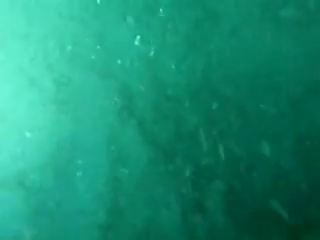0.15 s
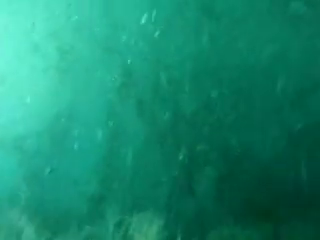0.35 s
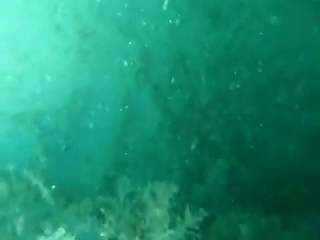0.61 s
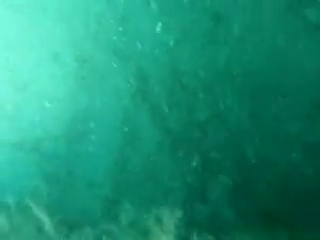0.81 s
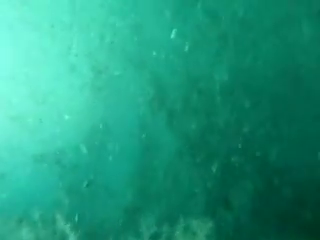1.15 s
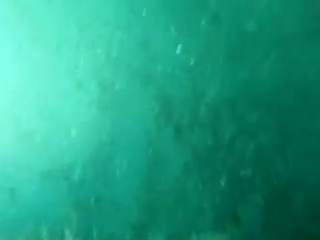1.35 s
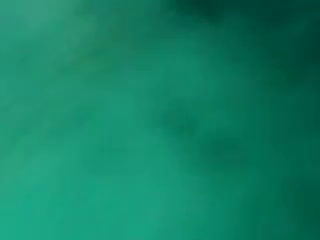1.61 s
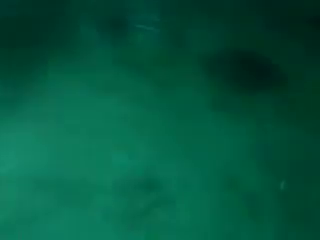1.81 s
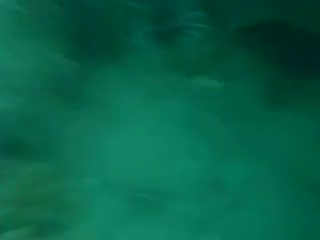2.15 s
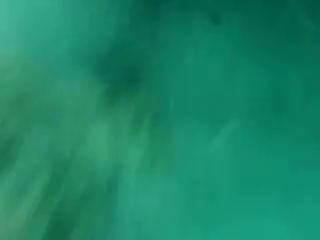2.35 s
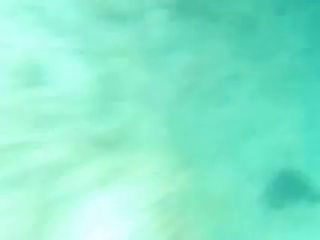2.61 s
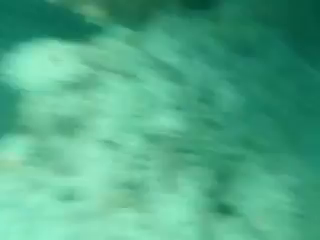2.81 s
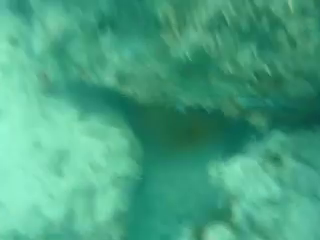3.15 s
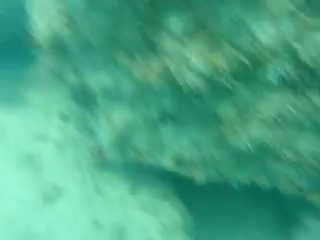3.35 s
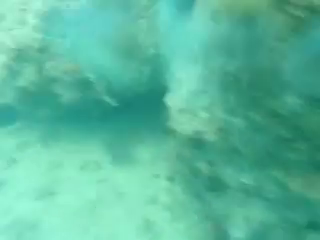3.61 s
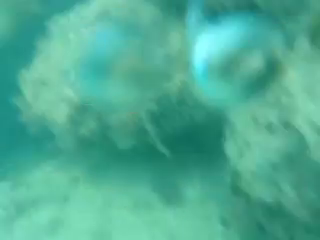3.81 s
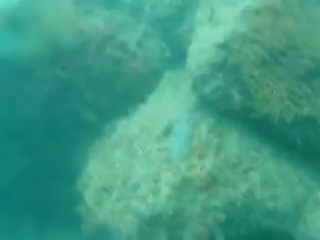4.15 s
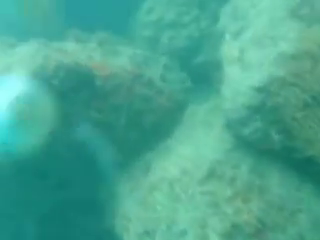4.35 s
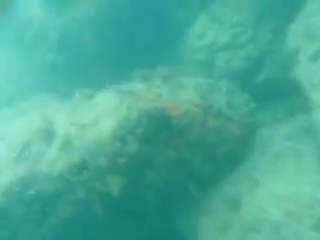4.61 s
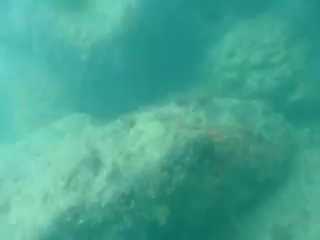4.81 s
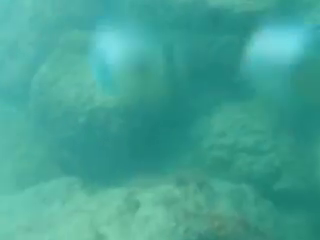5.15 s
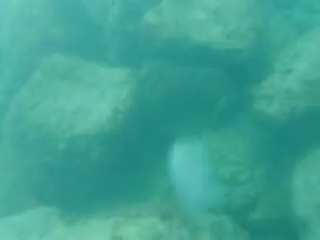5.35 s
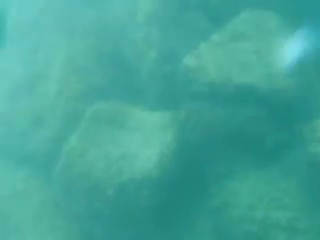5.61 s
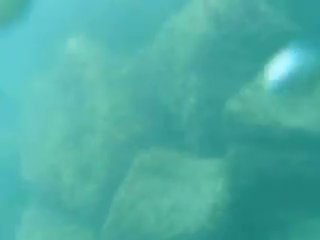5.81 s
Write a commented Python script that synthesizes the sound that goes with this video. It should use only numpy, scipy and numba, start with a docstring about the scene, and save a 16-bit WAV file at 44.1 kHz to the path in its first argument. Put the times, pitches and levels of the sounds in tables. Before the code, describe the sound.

Close, dull underwater sound with almost no treble. Water booms and swishes against the housing, with faint gritty crackle. Early knocks, a few pebble-like clicks, wobbly gulps and a scraping jolt midway, where the rush drops out for a moment; then clusters of bubble pops and small gurgling trains, a few soft thumps, and a steady resonant rush.

```python
"""Camera housing over a rocky seabed

Crackle and the rush of water, both filtered random kicks, surround a sealed camera housing; the rush booms in it.
Bubbles are decaying sines, trapped air gulps with a climbing pitch, and pebbles clack as sets of resonances.
Handling rubs lift the swish and grit, thumps are swelling sines, and knocks ring the housing.
The recorder passes little above 4 kHz; its limiter ducks at loud peaks, so the rush drops out for a moment."""
import sys
import numpy as np
from scipy import signal
from scipy.fft import rfft, irfft
from scipy.io import wavfile
from scipy.ndimage import uniform_filter1d
from numba import njit

SR = 44100
rng = np.random.default_rng(int(sys.argv[2]) if len(sys.argv) > 2 else 0)


def persist_wave(psi):
    """Save psi, clipped to +-1, as 16-bit WAV."""
    counts = np.round(np.clip(psi, -1, 1) * 32767).astype(np.int16)
    wavfile.write(sys.argv[1], SR, np.atleast_2d(counts).T)


N = 262836
T = np.arange(N) / SR
RING = np.arange(4096) / SR  # time axis of one short sound, s


def undb(db):
    """Decibels to gain."""
    return 10 ** (np.asarray(db) / 20)


def unit(x):
    """Scale to rms 1."""
    return x / np.sqrt(np.mean(x ** 2))


def curves(table):
    """Columns of a table, joined by straight lines in time."""
    time_s, *columns = np.transpose(table)
    return [np.interp(T, time_s, column) for column in columns]


def colour(x, points):
    """Shape the spectrum by (freq_hz, gain_db) points, at rms 1."""
    point_hz, point_db = np.transpose(points)
    freq_hz = np.maximum(np.fft.rfftfreq(N, 1 / SR), 1)
    gain_db = np.interp(np.log(freq_hz), np.log(point_hz), point_db)
    return unit(irfft(rfft(x) * undb(gain_db), N))


def low_pass(x, hz, order):
    """Butterworth treble cut."""
    return signal.sosfilt(signal.butter(order, hz, fs=SR, output="sos"), x)


def high_pass(x, hz):
    """Second-order Butterworth bass cut."""
    return signal.sosfilt(signal.butter(2, hz, "high", fs=SR, output="sos"), x)


def add(out, start_s, sound):
    """Mix a sound in at its start time."""
    i = max(int(start_s * SR), 0)
    out[i:i + len(sound)] += sound[:N - i]


def mode(hz, t60_s):
    """Struck resonance: a sine that falls 60 dB in t60_s."""
    return np.sin(2 * np.pi * hz * RING) * np.exp(-np.log(1000) * RING / t60_s)


def struck(modes):
    """Ring of a body with (freq_hz, level_db, t60_s) modes; neighbours swing opposite ways."""
    return sum((-1) ** k * undb(db) * mode(hz, t60_s) for k, (hz, db, t60_s) in enumerate(modes))


def kicks(per_second, spread_db, smooth):
    """Random impulses of uneven size over a share of smooth noise."""
    sizes = rng.choice([-1, 1], N) * undb(spread_db * np.minimum(rng.exponential(size=N), 4))
    hits = rng.random(N) < per_second / SR
    return unit(sizes * hits) + smooth * rng.standard_normal(N)


def steady(x, span_s):
    """Even out swells longer than span_s and keep the quick flutter."""
    size = max(int(span_s * SR), 2)
    power = uniform_filter1d(uniform_filter1d(x ** 2, size), size)
    return x / np.sqrt(power + 1e-6)


@njit
def resonate(x, hz, width_hz):
    """State-variable band-pass with moving centre and width."""
    y, band, low = np.empty(len(x)), 0., 0.
    for i in range(len(x)):
        g, k = np.tan(np.pi * hz[i] / SR), width_hz[i] / hz[i]
        v = (band + g * (x[i] - low)) / (1 + g * (g + k))
        band, low, y[i] = 2 * v - band, low + 2 * g * v, k * v
    return y


def swells(table, attack_s, release_s):
    """Gain over time for (start_s, length_s, level_db) rows: each rises, holds and dies away."""
    gain = np.zeros(N)
    for start_s, length_s, db in table:
        rise = np.clip((T - start_s) / attack_s, 0, 1)
        fall = np.exp(-np.maximum(T - start_s - length_s, 0) / release_s)
        gain += undb(db) * rise * fall
    return gain


# rubs along the housing: start_s, length_s, swish_db, grit_db
RUBS = [(0.676, 0.013, -19.5, -39.5), (1.475, 0.037, -16.5, -46.5), (1.564, 0.02, -18.5, -34.5),
        (1.657, 0.0076, -21, -35.5), (1.775, 0.012, -17, -45), (1.93, 0.052, -15.5, -44.5),
        (2.455, 0.026, -13, -21), (2.578, 0.02, -17.5, -40), (2.882, 0.013, -14.5, -40.5),
        (4.927, 0.014, -17, -42.5), (5.264, 0.013, -16, -43)]
RUB_ATTACK_S, RUB_RELEASE_S = 0.0072, 0.019


def rubbing():
    """Friction on the housing gives gains over time for swish and for grit."""
    swish = [(start_s, length_s, db) for start_s, length_s, db, _ in RUBS]
    grit = [(start_s, length_s, db) for start_s, length_s, _, db in RUBS]
    return [swells(rows, RUB_ATTACK_S, RUB_RELEASE_S) for rows in (swish, grit)]


# gritty hiss of water and silt on the housing: time_s, level_db
FIZZ = [(0, -41), (0.85, -44), (1.4, -45.5), (1.62, -39), (1.78, -53.5), (2.0, -43.5), (2.4, -37.5),
        (2.84, -35.5), (2.94, -50), (3.3, -45), (4.2, -43.5), (4.75, -49), (5.95, -49.5)]
# hiss spectrum: freq_hz, gain_db
CRACKLE_COLOUR = [(600, -16.5), (880, -4), (1000, 6.5), (1300, 0.5), (1530, -5), (1660, -0.5), (1900, -1),
                  (2170, -17.5), (2750, -19), (3300, -26.5), (4000, -19.5)]


def crackle():
    """Grit and ticks merge into a coloured hiss that rubbing lifts."""
    fizz_db, = curves(FIZZ)
    _, grit = rubbing()
    bursts = colour(kicks(per_second=320, spread_db=5.5, smooth=0.35), CRACKLE_COLOUR)
    return bursts * np.hypot(undb(fizz_db), grit)


# water flowing past, stronger once the camera sweeps: time_s, boom_db, rumble_db, swish_db
FLOW = [(0, -22.5, -31.5, -30), (0.42, -20, -32, -29), (0.6, -21.5, -33.5, -34.5),
        (0.95, -28.5, -37.5, -29), (1.36, -26, -32, -33), (1.68, -21.5, -22.5, -23),
        (1.86, -22, -22, -30.5), (2.02, -20.5, -26, -23.5), (2.2, -24, -23, -25.5),
        (2.4, -25.5, -28.5, -24), (2.7, -25, -26, -29.5), (2.95, -17.5, -19, -26.5),
        (3.15, -24, -21.5, -27.5), (3.45, -15, -21.5, -22.5), (4.05, -12, -26.5, -24.5),
        (4.45, -16, -22.5, -26.5), (4.82, -16, -23, -21), (5.2, -13, -26.5, -21.5), (5.95, -13, -20.5, -25)]
# main housing resonance, shifting with the grip: time_s, freq_hz, width_hz
HOUSING = [(0, 380, 165.6), (1.2, 418, 130), (1.8, 349.5, 225), (3.2, 371, 220), (3.8, 375, 76.6),
           (4.6, 355.7, 81.1), (5.3, 359, 55), (5.96, 348, 70)]
# eddy rumble spectrum: freq_hz, gain_db
RUMBLE_COLOUR = [(20, -30), (50, -32.5), (80, -16.5), (125, -9), (190, -1.5), (260, 0), (320, -3),
                 (420, -8), (700, -70.5)]


def rush():
    """Eddies boom at the housing resonance, between a low rumble and a swish that rubbing lifts."""
    boom_db, rumble_db, swish_db = curves(FLOW)
    hz, width_hz = curves(HOUSING)
    fizz_db, = curves(FIZZ)
    rub, grit = rubbing()
    eddies = kicks(per_second=510, spread_db=4.5, smooth=0.59)
    # the wall passes little on either side of its resonance
    boom = resonate(resonate(eddies, hz, width_hz), hz, np.full(N, 420.))
    boom = low_pass(boom, hz=700, order=4)
    rumble = colour(kicks(per_second=280, spread_db=3.0, smooth=0.63), RUMBLE_COLOUR)
    # faster water hisses more and sheds smaller eddies: swish pitch follows the hiss
    hiss = np.hypot(undb(fizz_db), grit)
    swish_hz = np.clip(575 * (hiss / undb(-41.5)) ** .19, 450, 720)
    swish = kicks(per_second=300, spread_db=3.5, smooth=.35)
    for _ in range(4):
        swish = resonate(swish, swish_hz, 0.76 * swish_hz)
    swish_gain = np.hypot(undb(swish_db), rub)
    parts = (boom, undb(boom_db)), (rumble, undb(rumble_db)), (swish, swish_gain)
    return sum(steady(x, span_s=0.14) * gain for x, gain in parts)


# stray bubbles, louder as the camera stirs the water: time_s, level_db
STRAY_BUBBLES = [(0, -56.5), (5.96, -48.5)]
# trains of small bubbles streaming by: start_s, length_s, level_db
BUBBLE_TRAINS = [(2.68, 0.18, -46.5), (3.2, 0.13, -45), (3.7, 0.27, -44), (4.23, 0.099, -37.5),
                 (4.41, 0.32, -41), (5.08, 0.28, -53.5), (5.72, 0.21, -47.5)]
TRAIN_ATTACK_S, TRAIN_RELEASE_S = 0.03, 0.031


def gurgle():
    """Random small bubbles, mostly faint: larger ones ring near 1 kHz, tiny ones tick higher up."""
    stray_db, = curves(STRAY_BUBBLES)
    out = np.zeros(N)
    for when, kind, size, life, force in rng.random(size=(1300, 5)):
        if kind < .5:
            hz, t60_s, db = 900 * 1.8 ** (size ** 2), 0.02 + 0.041 * life ** 2, -2.5
        else:
            hz, t60_s, db = 2300 * 1.38 ** size, 0.0023 + 0.01 * life, -1.2
        bent_hz = hz * (1 + .04 * np.minimum(RING / t60_s, 1))
        pinch_off = 1 - np.exp(-RING * hz)  # the ring builds up over about a cycle
        add(out, when * N / SR, undb(db + 12 * force ** 2) * pinch_off * mode(bent_hz, t60_s))
    trains = swells(BUBBLE_TRAINS, TRAIN_ATTACK_S, TRAIN_RELEASE_S)
    return steady(out, span_s=0.037) * np.hypot(undb(stray_db), trains)


# pockets of trapped air, as the camera turns: start_s, length_s, peak_db, start_pitch_hz
GULPS = [(1.663, 0.082, -11, 216.1), (1.781, 0.069, -11.5, 274.3), (1.857, 0.069, -14, 195.6)]
GULP_OCTAVES_PER_S = 5.88


def gulps():
    """A large air pocket wobbles, swelling and fading while its pitch climbs."""
    out = np.zeros(N)
    for start_s, length_s, db, hz in GULPS:
        phase = 2 * np.pi * np.cumsum(hz * 2 ** (GULP_OCTAVES_PER_S * RING)) / SR
        swell = np.sqrt(np.abs(np.sin(np.pi * np.minimum(RING / length_s, 1))))
        add(out, start_s, undb(db) * swell * np.sin(phase))
    return out


# pebble resonances heard through the wall: freq_hz, level_db, t60_s
PEBBLE = [(560, 9, 0.012), (1010, 2.5, 0.011), (1490, 2, 0.0046), (1903, 1, 0.025), (2530, -1.5, 0.018),
          (2860, -2, 0.0091)]
# dry clacks, like pebbles meeting: start_s, level_db, tilt_db_per_octave
CLACKS = [(0.8609, -16.5, 1), (1.0004, -25, -3), (1.0030, -18.5, -2.5), (1.0270, -33, -2)]


def clacks():
    """Short broad clacks with several resonances; a harder contact favours the high ones."""
    out = np.zeros(N)
    for start_s, db, tilt_db in CLACKS:
        modes = [(hz, mode_db + tilt_db * np.log2(hz / 1500), t60_s) for hz, mode_db, t60_s in PEBBLE]
        add(out, start_s, undb(db) * struck(modes))
    return high_pass(out, hz=250)


# housing wall resonances: freq_hz, level_db, t60_s
WALL = [(640, 6.5, .008), (1030, 3.5, .013), (1730, -11, 0.012), (2000, -11.5, 0.016), (2450, -19, 0.0031),
        (3140, -31, 0.0053)]


def wall_ring():
    """The housing wall rings in all its modes when jolted."""
    return struck(WALL)


# loudest bubble pops: start_s, level_db, pitch_hz, t60_s
POPS = [(2.1022, -14.5, 1140, 0.016), (2.415, -11.5, 1380, 0.0058), (2.5921, -12, 2120, 0.01),
        (2.811, -13, 1720, 0.013), (2.836, -13, 1030, 0.013), (2.985, -10.5, 1440, 0.0071),
        (3.162, -10.5, 1740, 0.013), (3.2094, 0, 1150, 0.009), (3.2456, -14.5, 2500, 0.0047),
        (3.2621, -8.5, 1580, 0.013), (3.6117, -2, 943, 0.023), (3.615, -4, 1506, 0.017),
        (3.6615, -0.5, 1030, 0.025), (3.696, -10, 1680, 0.034), (3.7114, 0.5, 1030, 0.013),
        (3.747, -12, 3180, 0.016), (3.792, -3.5, 1840, 0.009), (3.822, -5, 1100, 0.012),
        (3.8586, -13, 1390, 0.0064), (3.9406, -12, 1250, 0.017), (4.2393, -17.5, 2860, 0.016),
        (4.286, -16, 1410, .012), (4.297, -21.5, 1002, 0.12), (4.316, -20, 2910, 0.011),
        (4.425, -26.5, 1250, 0.12), (4.4528, -11, 2460, 0.017), (4.477, -16.5, 964, 0.043),
        (4.6220, -14.5, 1610, 0.015), (4.655, -21, 1040, 0.12), (4.962, -1.5, 1250, 0.011),
        (5.0281, -4.5, 1390, 0.0074), (5.0969, -18.5, 2180, 0.016), (5.174, -8.5, 1810, 0.0059),
        (5.286, -18, 2960, 0.017)]


def pops():
    """Each bubble rings at the pitch of its size; its snap also jolts the housing wall."""
    out, wall = np.zeros(N), wall_ring()
    for start_s, db, hz, t60_s in POPS:
        add(out, start_s, undb(db - 3.5) * (mode(hz, t60_s) - undb(-9.5) * wall))
    return high_pass(out, hz=374)


# soft thumps of handling: start_s, level_db, pitch_hz
THUMPS = [(0.147, -7.5, 363), (0.336, 0.5, 316), (0.436, -5, 384), (0.645, -14, 400), (0.688, -7.5, 420),
          (0.744, -12, 431), (1.033, -15.5, 334), (1.079, -6, 452), (1.094, -10.5, 423), (1.182, -5, 386),
          (1.292, -14, 361), (1.511, -5.5, 285), (1.57, -11, 447), (1.661, -8, 307), (1.779, -10, 431),
          (1.868, -13, 440), (2.074, -11.5, 292), (2.253, -8, 306), (2.889, -5.5, 317), (3.024, -8, 360),
          (3.195, -7.5, 283), (4.696, -2, 350), (4.77, -3, 360), (4.863, -6, 341), (4.93, -6, 354)]
THUMP_SWELL_S = 0.0039


def thumps():
    """A soft push swells over a cycle or two and dies away."""
    out, age = np.zeros(N), RING / THUMP_SWELL_S
    swell = (age * np.exp(1 - age)) ** 2
    for start_s, db, hz in THUMPS:
        add(out, start_s, undb(db + 3.5) * swell * np.sin(2 * np.pi * hz * RING))
    return out


# hard knocks on the housing: start_s, level_db, pitch_hz, crack_db (relative to the knock)
KNOCKS = [(0.2030, -4.5, 417, -11.5), (0.231, -1, 410, -16.5), (0.2418, 1, 520, -20.5),
          (0.3405, 6, 379, -11), (0.4034, 3, 378, -13), (0.422, 1, 494, -25), (0.4254, 3.5, 372, -26),
          (0.4553, 5.5, 435, -4.5), (0.458, 12, 417, -24.5), (1.5026, 2.5, 372, -34.5),
          (1.6794, 0.5, 252, -15), (2.4274, -0.5, 410, -1), (2.4808, 18.5, 620, -6), (2.621, 4, 460, -32),
          (2.6346, 3.5, 397, -18), (2.8950, -2, 408, -6.5), (3.259, -7.5, 407, -3.5), (3.6603, -6, 736, -6),
          (3.7827, -5, 435, 6), (5.0275, -2, 400, -7)]
KNOCK_T60_S = 0.023


def knocks():
    """A hard contact cracks dully and sets the housing ringing briefly."""
    out = np.zeros(N)
    crack = mode(hz=1217, t60_s=0.016) + undb(-5.0) * wall_ring()
    for start_s, db, hz, crack_db in KNOCKS:
        ring = mode(hz, KNOCK_T60_S) + undb(crack_db - 8.5) * crack
        add(out, start_s, -undb(db + 2.5) * ring)
    # the thick wall rounds the contact off
    return high_pass(low_pass(out, hz=2500, order=2), hz=187)


def scene():
    """Everything that reaches the microphone inside the housing."""
    water = crackle() + rush() + gurgle() + gulps()
    contacts = clacks() + pops() + thumps() + knocks()
    return (water + contacts)[None]


@njit
def limiter_gain(x, ceiling, attack_s, hold_s, release_s):
    """Turn down quickly at a peak, hold, then recover."""
    gain, g, wait_s = np.empty(len(x)), 1., 0.
    for i in range(len(x)):
        if abs(x[i]) * g > ceiling:
            g += (ceiling / abs(x[i]) - g) / (1 + attack_s * SR)
            wait_s = hold_s
        elif wait_s > 0:
            wait_s -= 1 / SR
        else:
            g = min(1., g * (1 + 1 / (release_s * SR)))
        gain[i] = g
    return gain


BAND_HZ, TOP_HZ = 4050, 15800  # cutoffs before and after clipping


def record(dry):
    """Band-limit, duck at loud peaks, add hiss, band-limit again, then clip what still overshoots."""
    mic = low_pass(high_pass(dry[0], hz=63.6), hz=3650, order=6)
    gain = limiter_gain(mic, ceiling=0.52, attack_s=0.00015, hold_s=0.037, release_s=0.034)
    hiss = undb(-46) * low_pass(rng.standard_normal(N), hz=3650, order=6)
    padded = np.pad(mic * gain + hiss, (0, SR))
    narrow = signal.sosfiltfilt(signal.butter(10, BAND_HZ, fs=SR, output="sos"), padded)[:N]
    clipped = np.clip(narrow, -.71, .71)
    return signal.sosfilt(signal.ellip(8, .2, 70, TOP_HZ, fs=SR, output="sos"), clipped)[None]


dry = scene()
out = record(dry)
persist_wave(out)
```